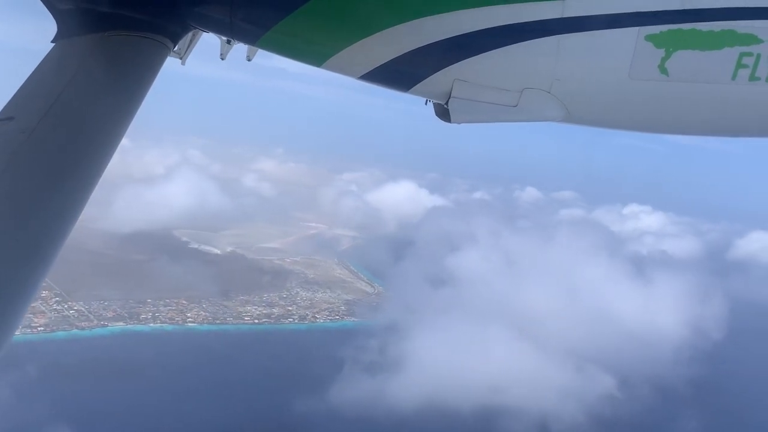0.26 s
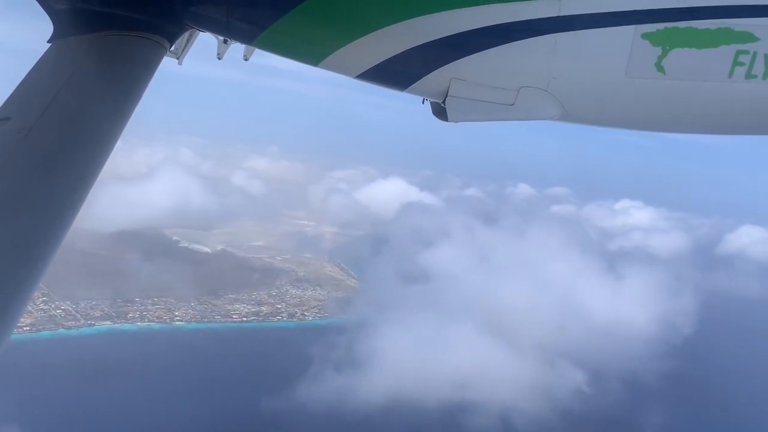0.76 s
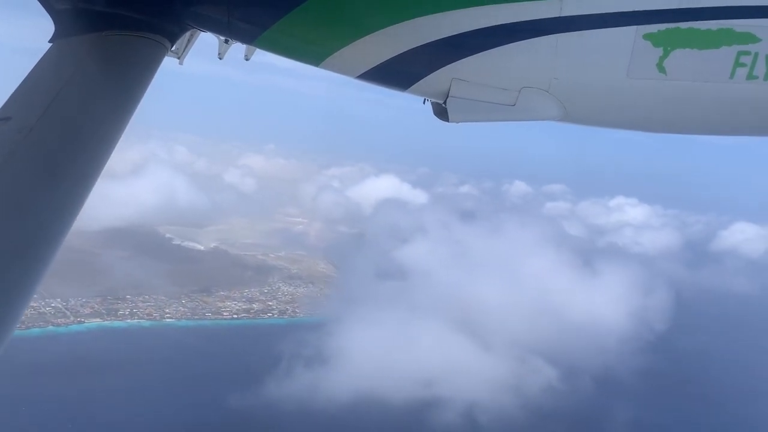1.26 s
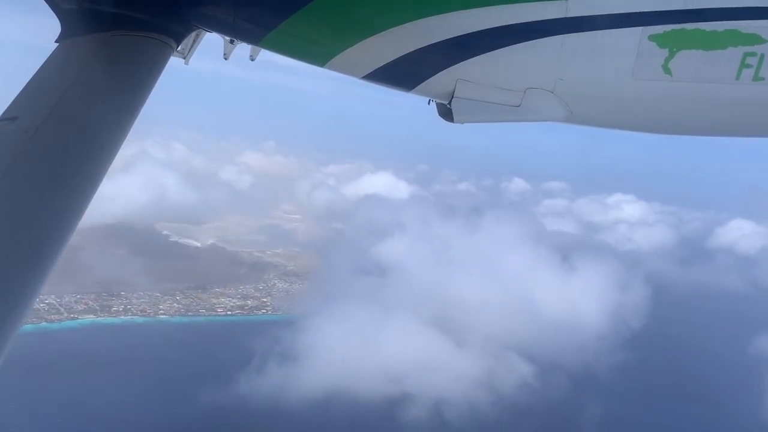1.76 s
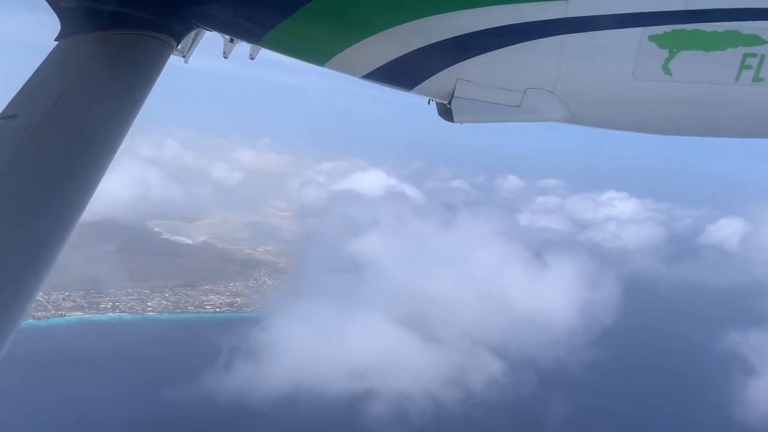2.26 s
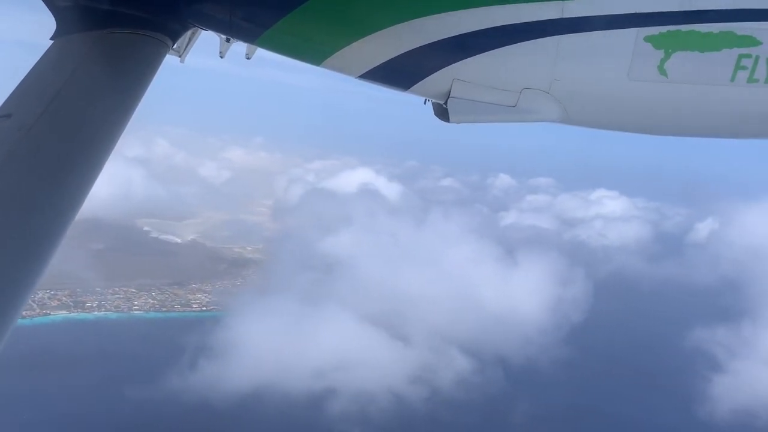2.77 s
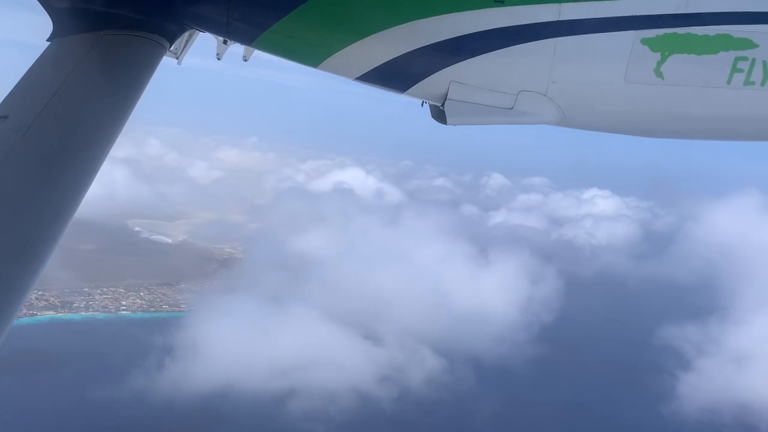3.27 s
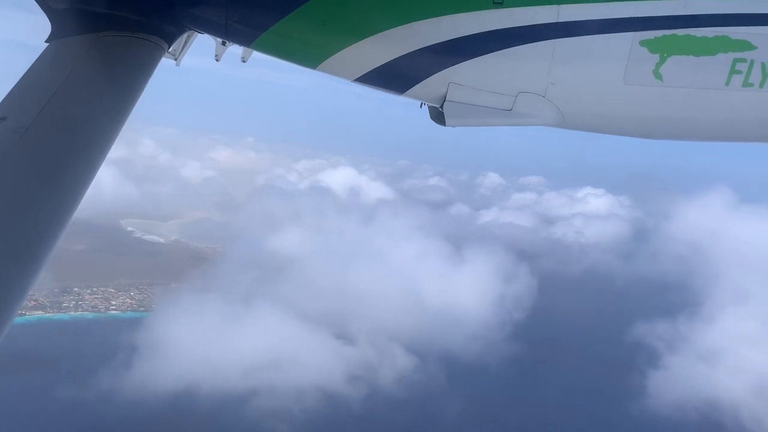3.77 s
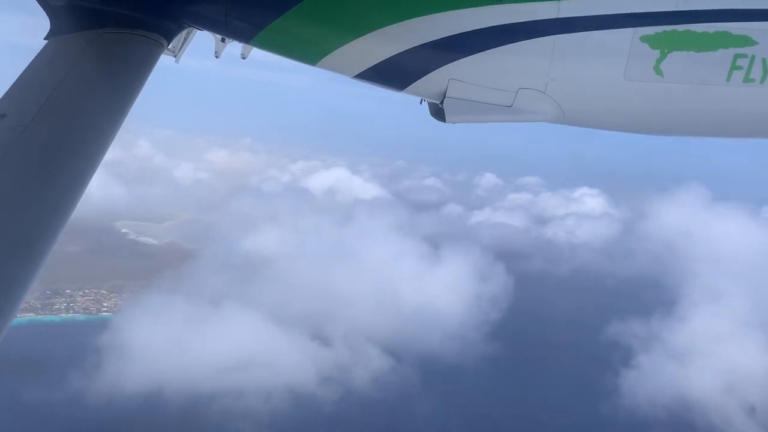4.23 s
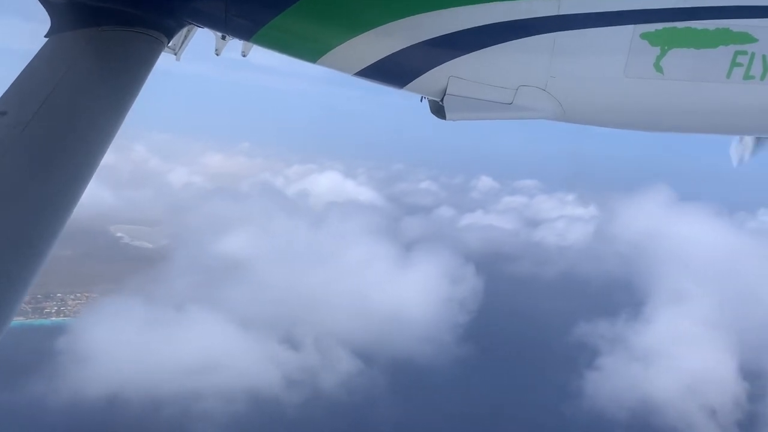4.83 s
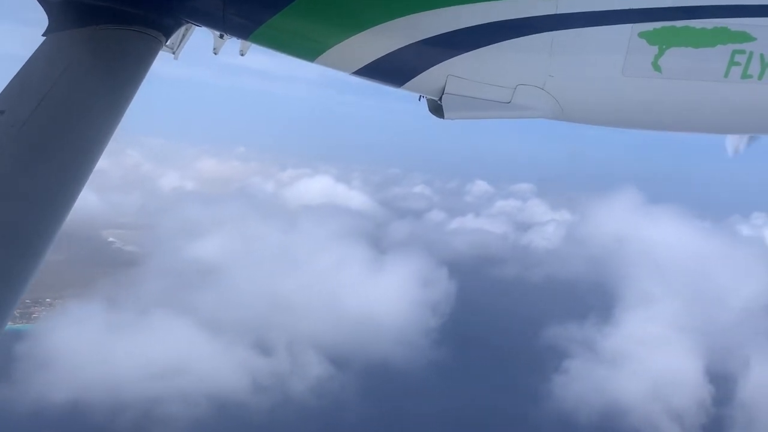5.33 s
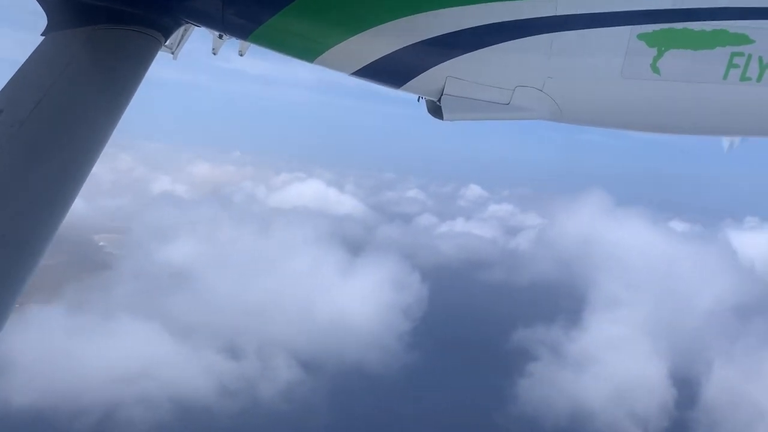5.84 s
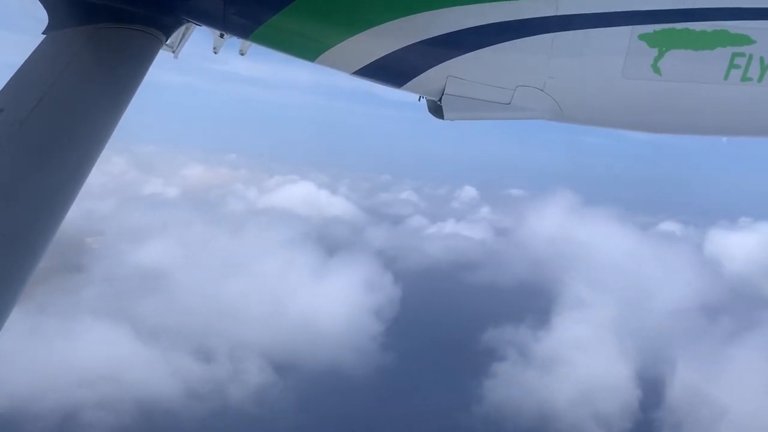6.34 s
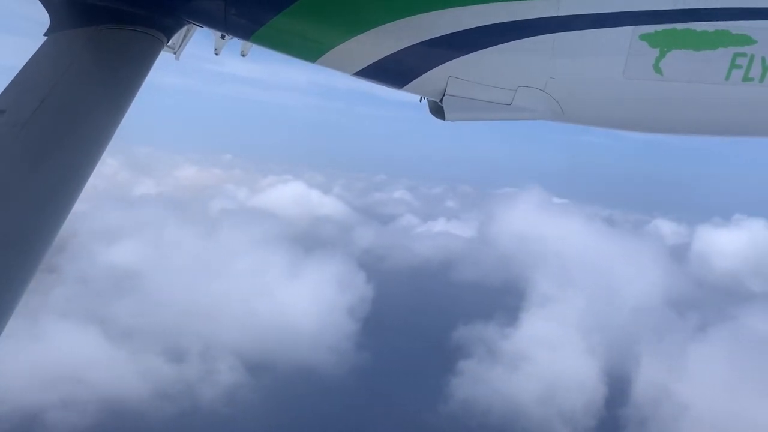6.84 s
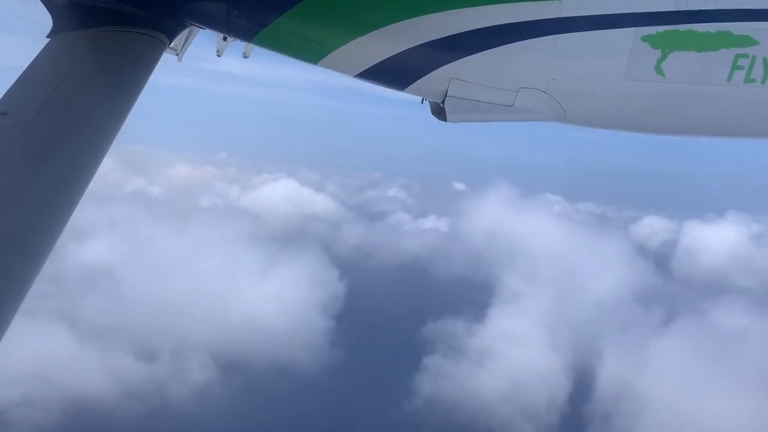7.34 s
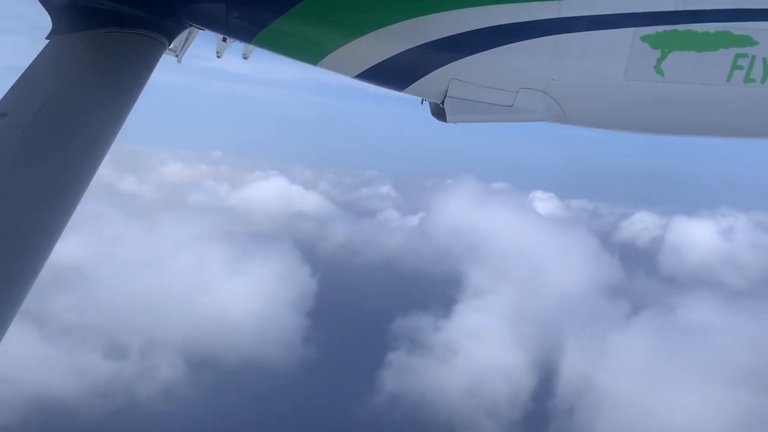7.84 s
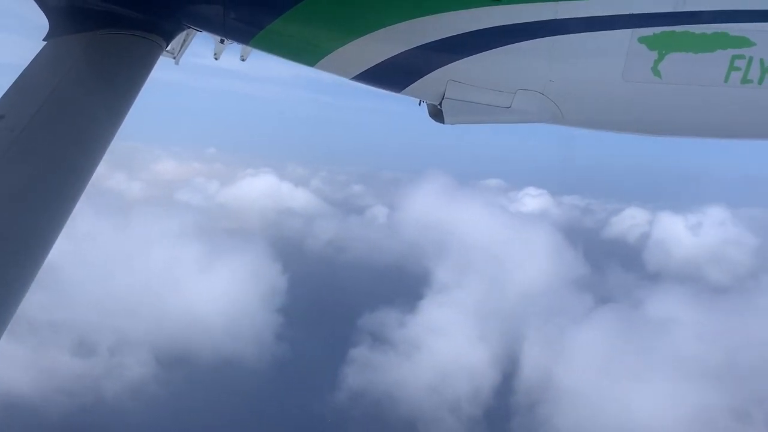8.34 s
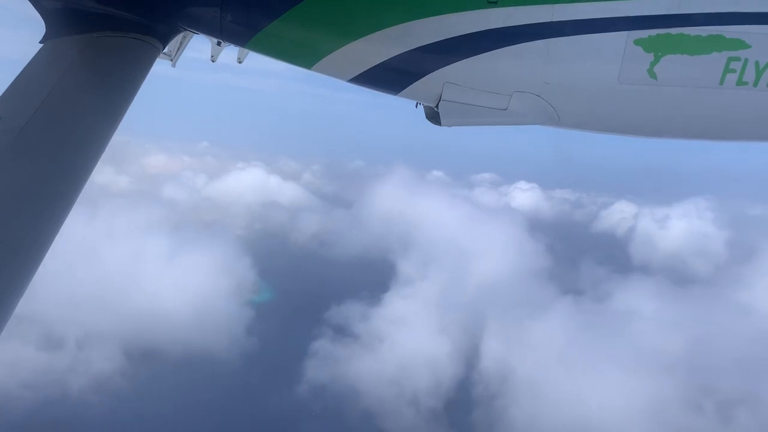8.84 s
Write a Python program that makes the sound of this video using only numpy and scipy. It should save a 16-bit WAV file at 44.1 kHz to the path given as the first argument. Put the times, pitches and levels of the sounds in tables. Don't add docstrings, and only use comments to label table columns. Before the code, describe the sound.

Inside a twin-propeller aircraft cabin, a loud low engine drone swells, thins and swells again beneath steady airflow roar, hiss and faint turbine whine.

```python
import sys
import numpy as np
from scipy import signal
from scipy.fft import rfft, irfft
from scipy.io import wavfile

SR = 44100
rng = np.random.default_rng(int(sys.argv[2]) if len(sys.argv) > 2 else 0)


def ratio_of_db(decibels):
    return 10 ** (np.asarray(decibels, float) / 20)


def dump_mix(stems):
    frames = np.atleast_2d(stems).T
    limited = np.clip(frames, -1, 1)
    pcm = np.round(limited * 32767).astype(np.int16)
    wavfile.write(sys.argv[1], SR, pcm)


N = 401310
SECONDS = np.arange(N) / SR
HZ = np.maximum(np.fft.rfftfreq(N, 1 / SR), 1)


def in_time(rows):
    s, *columns = np.transpose(rows)
    return [np.interp(SECONDS, s, c) for c in columns]


def at_hz(points):
    hz, value = np.array(points)[:, :2].T
    return np.interp(np.log(HZ), np.log(hz), value)


def drift(rate):
    r = np.exp(-200 * np.pi * rate / SR)
    slow = signal.lfilter([1], [1, -2 * r, r * r], rng.standard_normal(N // 100 + 2002))[2000:]
    return np.interp(np.arange(N) / 100, np.arange(len(slow)), slow / np.std(slow))


def window_lead(hz):
    lag_s, in_step_hz = .000168, 7550
    steering = .25
    lead = -2 * np.pi * (hz - in_step_hz) * lag_s
    return lead - steering * np.sin(2 * lead)


def stereo_noise(gain, alike, lead):
    # (frequency [Hz], left minus right [dB])
    tilt = [(50, 1), (110, -5), (200, -4.5), (300, 0), (490, 2.5), (620, -2.5), (930, 5), (1100, 1),
            (1600, -1), (2600, 2.5), (4000, 0.5), (5900, -3.5), (7500, 1)]
    shared, left, right = rfft(rng.standard_normal((3, N)))
    alike = np.clip(alike, 0, 1)
    shift = np.exp(.5j * np.outer([1, -1], lead + 0 * HZ))
    both = np.sqrt(alike) * shared * shift + np.sqrt(1 - alike) * np.array([left, right])
    balance = ratio_of_db(np.outer([.5, -.5], at_hz(tilt)))
    return irfft(both * gain * np.sqrt(SR / 2) * balance, N)


def propellers(turn, slip):
    # (order of blade rate, left level [dB], right level [dB])
    near_orders = [(1, -19.3, -17.1), (2, -27.8, -24.8), (3, -42.6, -48.1), (4, -39.5, -36.5),
                   (5, -49.1, -50.9), (6, -48.1, -61.2), (7, -55.9, -56.3), (8, -52.2, -60.3),
                   (9, -54.3, -59.3), (10, -62.7, -62.4), (11, -60.8, -62.6), (14, -56.8, -60.0)]
    # (order, left level [dB], right level [dB],
    # slip at which it adds to the near one at left, at right [blade spacings])
    far_orders = [(1, -17.7, -17.0, 0.044, 0.0), (2, -26.0, -23.5, 0.163, 0.163),
                  (3, -34.2, -32.6, 0.08, 0.077), (4, -40.5, -37.5, 0.01, 0.015),
                  (5, -51.4, -58.2, -0.064, -0.032), (6, -55.2, -65.7, 0.069, 0.047),
                  (7, -65.0, -64.1, 0.032, -0.07), (8, -84.2, -64.6, 0.012, 0.01),
                  (9, -66.2, -70.1, 0.041, 0.003), (10, -63.7, -70.5, -0.002, 0.023),
                  (11, -79.1, -75.2, -0.012, -0.026), (14, -75.5, -82.2, 0.012, 0.023)]
    # (time [s], offset from the seat's middle [hand-widths])
    place = [(0.0, -1.4), (0.6, -0.4), (1.3, 0.95), (2.0, 0.24), (2.3, -1.26), (3.6, -1), (4.3, -0.094),
             (4.9, 0.074), (5.9, 0.86), (6.8, 0.15), (7.3, 1.13), (7.8, 0.35), (8.4, 0.28), (9.1, 1.07)]
    # (level at the middle [dB], slope [dB per hand-width])
    standing = [
        (0.27, 0.2),
        (-0.67, -1.15),
        (1.16, 4),
        (-0.9, -2),
    ]
    high_orders_db = [2.5, 2, 3, 2, 3, 6, 1, 1.5]
    bass_lead = .13

    sway, = in_time(place)
    place_db = [middle_db + slope_db * sway for middle_db, slope_db in standing] + list(high_orders_db)
    scatter = rng.random((len(near_orders), 2))
    out = np.zeros((2, N))
    for (k, *near_db), (_, left_db, right_db, *adds_at), own, db in zip(near_orders, far_orders, scatter, place_db):
        cycles = k * turn + 0.28 * (k > 1) + (k > 4) * own[:, None]
        start = 2 * np.pi * cycles + (k == 1) * bass_lead * np.array([[.5], [-.5]])
        behind = 2 * np.pi * k * (slip - np.array(adds_at)[:, None])
        near = ratio_of_db(near_db)[:, None] * np.cos(start)
        far = ratio_of_db([[left_db], [right_db]]) * np.cos(start + behind)
        waver = ratio_of_db(db + .15 * k * drift(4))
        out += np.sqrt(2) * waver * (near + far)
    return out


def uneven_blades(turn):
    # (cycles per shaft turn, level at first [dB], level at the swell [dB], unsteadiness [dB])
    shaft = [
        (1, -45.5, -43.5, 1.0),
        (2, -43, -34.5, 2.0),
    ]
    # (time [s], share [0-1])
    swell_curve = [
        (0, 0),
        (4, 0),
        (5.9, 0.9),
        (6.6, 1.1),
        (7.2, 1.1),
        (7.7, 0.5),
        (9.1, .6),
    ]
    swell, = in_time(swell_curve)
    blades = 3
    out = np.zeros(N)
    for k, first_db, swell_db, waver_db in shaft:
        level = ratio_of_db(first_db + (swell_db - first_db) * swell + waver_db * drift(3.8))
        out += np.sqrt(2) * level * np.cos(2 * np.pi * k * turn / blades)
    return out


def roar():
    # (frequency [Hz], level [dB per Hz])
    spectrum = [(20, -53), (30, -62.5), (39, -58.5), (50, -56.5), (60, -52), (110, -54), (140, -52.5),
                (215, -49.5), (300, -54.5), (380, -56), (470, -59.5), (580, -69), (750, -71), (1050, -74.5),
                (1400, -74.5)]
    # (frequency [Hz], left-right likeness [0-1])
    likeness = [
        (40, .995),
        (250, .96),
        (380, .85),
        (480, .3),
        (1400, .3),
    ]
    rumble_cut = np.minimum(HZ / 21, 1) ** 8
    gain = ratio_of_db(at_hz(spectrum)) * (HZ < spectrum[-1][0]) * rumble_cut
    return stereo_noise(gain, at_hz(likeness), -0.18) * ratio_of_db(1.25 * drift(5.7))


def panels():
    # (frequency [Hz], width [Hz], level on top [dB per Hz], left leads by [radians])
    ringing = [(550, 60, -65, -2.0), (675, 60, -63.5, -1.0), (790, 50, -65, -1.3), (865, 40, -69, -2.5),
               (950, 70, -66.5, -1.5), (1195, 80, -67.5, .1), (1340, 80, -72, 2.0), (1560, 200, -74, -2.3),
               (1945, 130, -71.5, -2.2), (2305, 100, -75.5, .5), (2438, 22, -73.5, .8),
               (2740, 80, -77, 2.0), (3042, 90, -73, 2.5)]
    hz, width, top_db, lead = np.transpose(ringing)[:, :, None]
    power = ratio_of_db(2 * top_db) / (1 + (2 * (HZ - hz) / width) ** 2) ** 2
    strongest = power.argmax(axis=0)
    return stereo_noise(np.sqrt(power.sum(axis=0)), 0.78, lead[strongest, 0])


def hiss():
    # (frequency [Hz], level [dB per Hz])
    spectrum = [(1400, -76), (1700, -77), (2300, -75.5), (2750, -79), (2950, -79.5), (3200, -82),
                (4500, -84), (5800, -93)]
    skin_top_hz = 7900
    gain = ratio_of_db(at_hz(spectrum)) * (HZ >= spectrum[0][0]) / (1 + (HZ / skin_top_hz) ** 12)
    return stereo_noise(gain, 0.04, window_lead(HZ)) * ratio_of_db(0.75 * drift(13))


def whine():
    lines_hz = [8592, 8936, 9250, 9279, 9365, 9421, 9451.5, 9507, 9536, 9593, 10024, 10538, 10912, 11685,
                11771, 11858, 11944, 12116, 12288]
    # (at first [dB], at last [dB])
    lines_db = [(-76, -76), (-75, -75), (-76, -76), (-71, -73), (-61, -65), (-74, -74), (-66, -60),
                (-73, -73), (-72, -72), (-67, -69), (-74, -74), (-76, -76), (-77, -77), (-71, -73),
                (-71, -72), (-70, -68), (-71, -71), (-78, -77), (-77, -77)]
    progress = SECONDS / SECONDS[-1]
    creep = np.cumsum(1 + 0.000488 * (progress - .5) + .00012 * drift(2.1)) / SR
    out = np.zeros((2, N))
    for hz, (first_db, last_db) in zip(lines_hz, lines_db):
        level = ratio_of_db(first_db + (last_db - first_db) * progress + 2.8 * drift(4))
        start = 2 * np.pi * (hz * creep + rng.random())
        out += np.sqrt(2) * level * np.cos(start + window_lead(hz) * np.array([[.5], [-.5]]))
    return out


def leak(turn):
    # (frequency [Hz], level [dB per Hz])
    spectrum = [(5200, -108), (6400, -94), (7000, -92.5), (7800, -91.5), (8500, -87), (9100, -87),
                (9430, -81), (9700, -89), (11400, -91), (11850, -86), (12400, -94), (13200, -95.5),
                (14500, -95), (15200, -95), (15750, -93)]
    each_blade_db = .8 * np.cos(2 * np.pi * (turn - .55)) + .4 * np.cos(4 * np.pi * turn)
    wash = ratio_of_db(each_blade_db + .35 * drift(12))
    gain = ratio_of_db(at_hz(spectrum) - 1.64) * (HZ > spectrum[0][0])
    return wash * stereo_noise(gain, .985, window_lead(HZ))


def vent():
    # (time [s], frequency [Hz], level [dB])
    whistle = [
        (0, 926, -60),
        (4, 932, -59),
        (6.3, 940, -58),
        (6.8, 950, -53),
        (9.1, 954, -53),
    ]
    hz, level_db = in_time(whistle)
    level = ratio_of_db(level_db + 2.5 * drift(3))
    tone = np.sqrt(2) * level * np.cos(2 * np.pi * np.cumsum(hz + 1.1 * drift(2)) / SR)
    return tone * ratio_of_db([[-3], [0]]) * [[-1], [1]]


def scene():
    # (time [s], rate [Hz])
    blade_rate = [
        (0, 85.8),
        (1.5, 85.79),
        (2.2, 85.93),
        (3.7, 85.89),
        (5.0, 85.99),
        (6.9, 85.96),
        (8.3, 86.06),
        (9.1, 86.04),
    ]
    # (time [s], slip [blade spacings])
    slip_curve = [(0.0, -0.22), (0.4, -0.246), (1.0, -0.154), (1.69, -0.15), (2.05, -0.0055), (2.7, 0.053),
                  (3.3, 0.136), (4.04, 0.3), (4.9, 0.35), (5.75, 0.34), (6.07, 0.384), (7.08, 0.66),
                  (8.09, 0.92), (8.6, 0.95), (9.1, 1)]
    # (time [s], level [dB])
    gain_curve = [
        (0.0, -0.1),
        (0.7, 0.56),
        (2.0, 0),
        (3.25, -0.6),
        (4.3, -1.05),
        (5.2, -0.96),
        (5.85, -0.7),
        (7.15, 2.35),
        (7.8, 2.0),
        (9.1, -0.5),
    ]
    (blade_hz,), (slip,), (gain_db,) = in_time(blade_rate), in_time(slip_curve), in_time(gain_curve)
    turn = .33 + np.cumsum(blade_hz) / SR
    blades = ratio_of_db(0.93 * gain_db) * (propellers(turn, slip) + uneven_blades(turn))
    low = ratio_of_db(1.5 + 0.77 * gain_db) * (roar() + panels() + vent())
    high = ratio_of_db(gain_db) * hiss() + ratio_of_db(1 + 0.93 * gain_db) * (leak(turn) + whine())
    return blades + low + high


def top_cut(x):
    return signal.sosfilt(signal.butter(12, 15760, fs=SR, output="sos"), x)


def record(dry):
    fade = np.minimum((SECONDS[-1] - SECONDS) / .002, 1)
    rounded = 1.495 * np.tanh(dry / 1.549)
    return top_cut(rounded * fade)


dry = scene()
out = record(dry)
dump_mix(out)
```